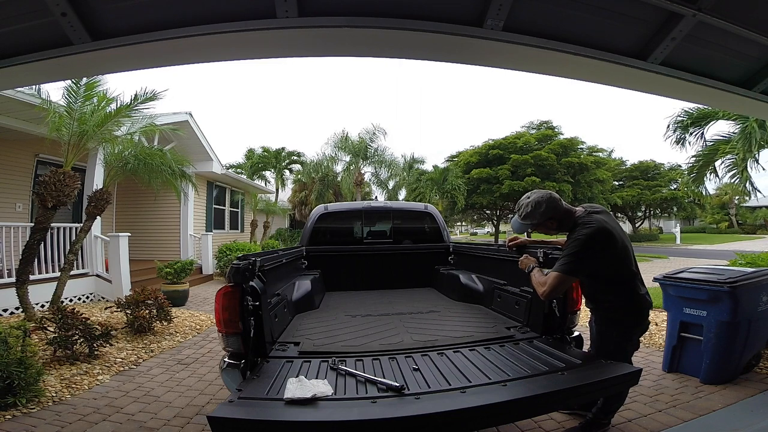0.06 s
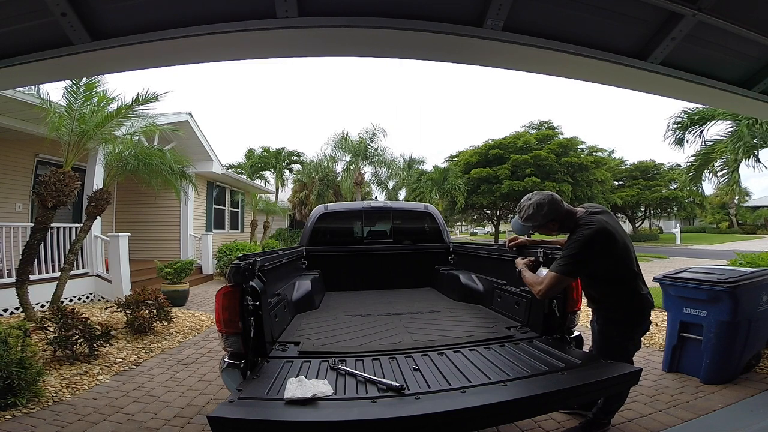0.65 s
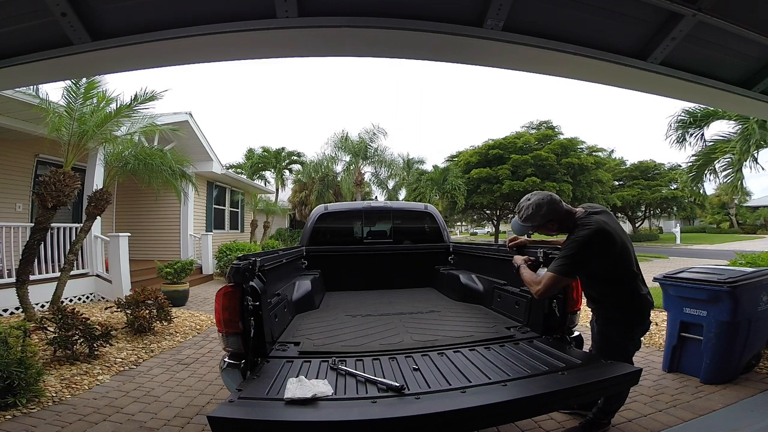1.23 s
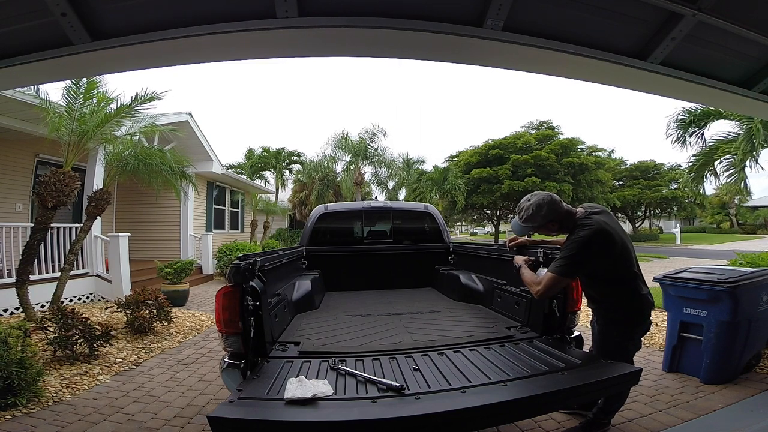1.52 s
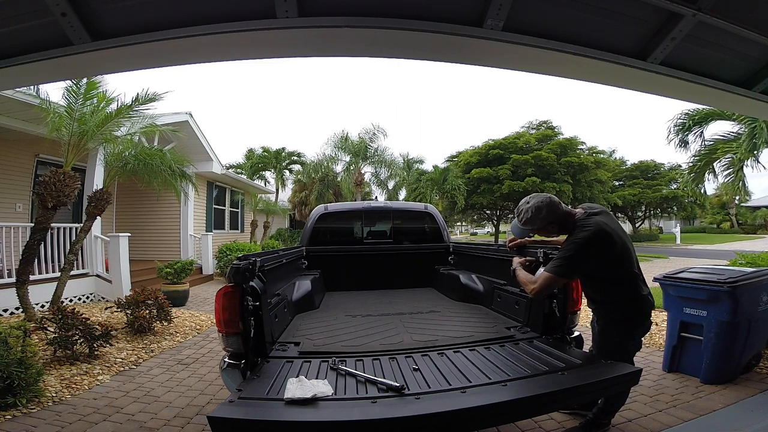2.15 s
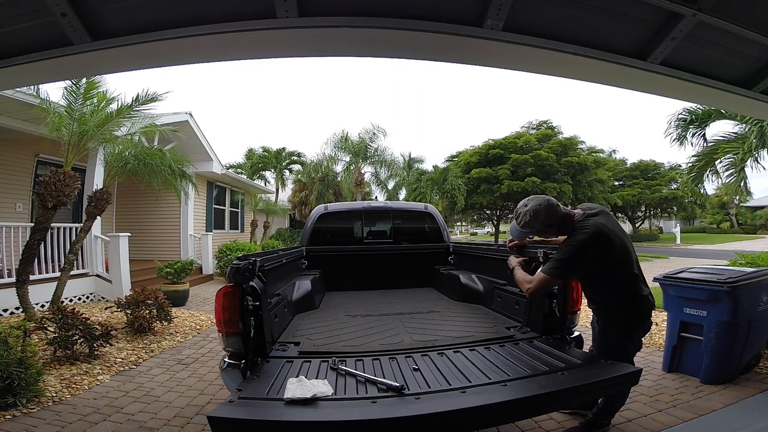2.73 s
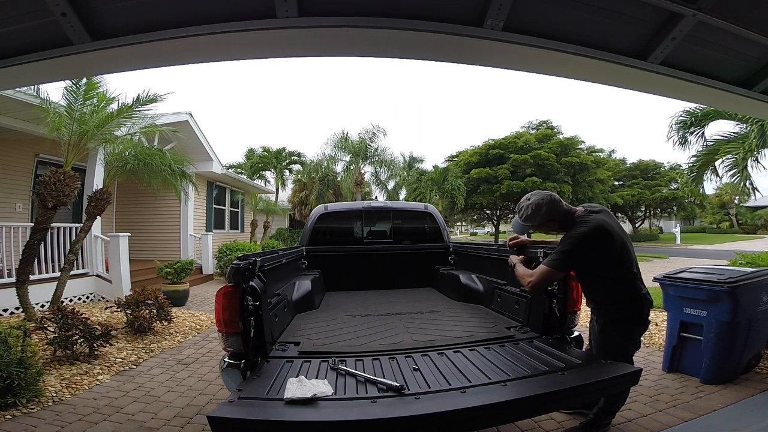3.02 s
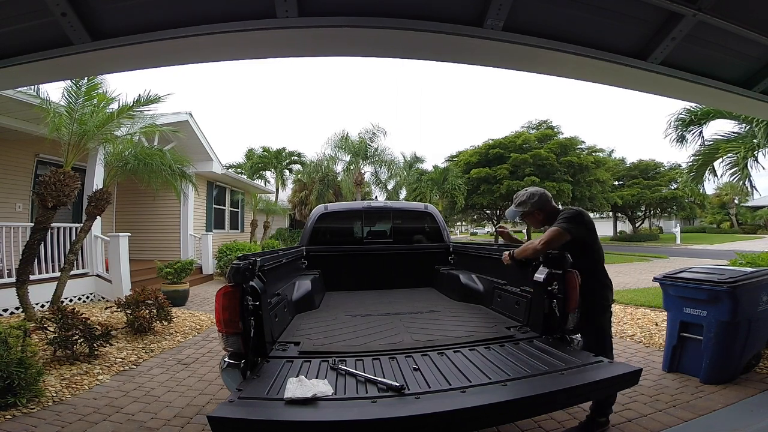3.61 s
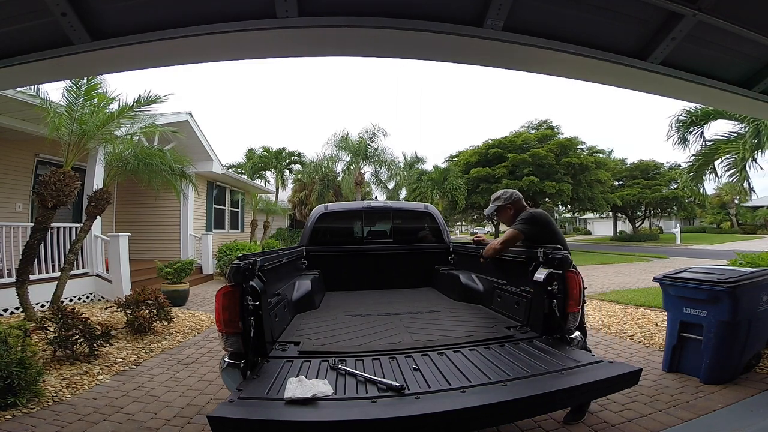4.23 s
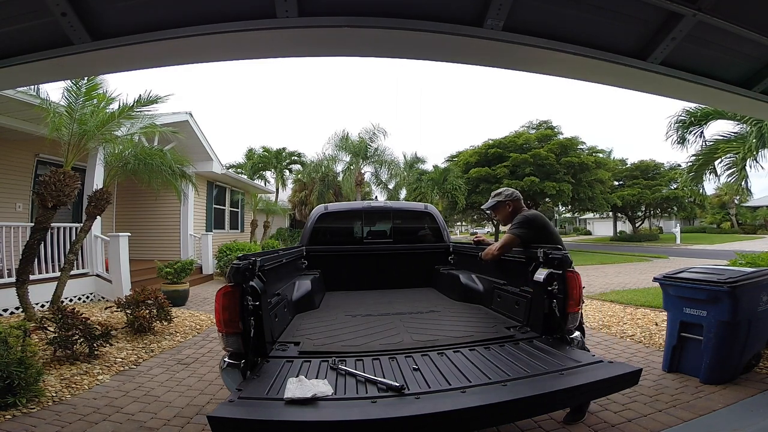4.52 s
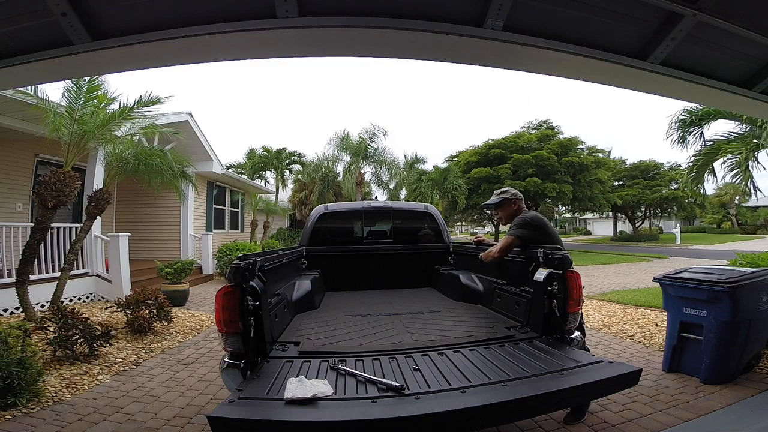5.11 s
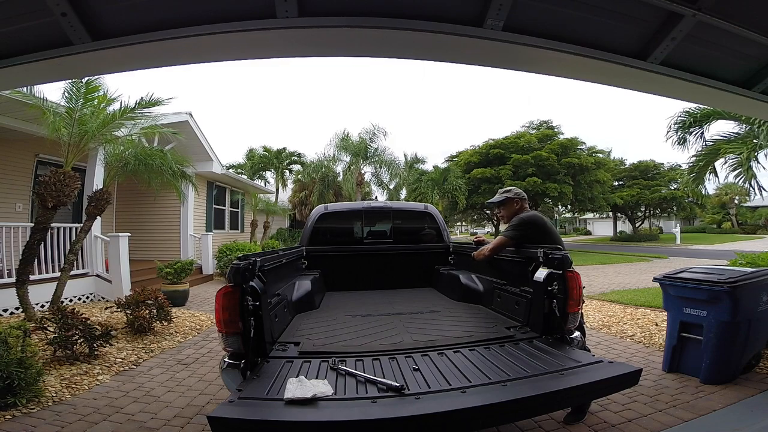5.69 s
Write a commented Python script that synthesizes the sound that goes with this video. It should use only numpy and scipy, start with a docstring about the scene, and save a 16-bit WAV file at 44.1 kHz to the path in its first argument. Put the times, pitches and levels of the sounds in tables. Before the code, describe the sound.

A soft outdoor hiss and a low hum run throughout, with a distant bird giving four faint falling whistles and a couple of short rasps. Up front, a metal bracket is fitted to a pickup's bed rail. After two faint taps, a firm ringing knock comes at 1.3 seconds, then several lighter ones and a sharp knock at 2.3. From 2.6 to 3 seconds the bracket scrapes along the rail in short, rough pushes. A crisp knock at 3.4 starts more scraping, which builds to one bright, ringing clank at about 4.1 seconds, the loudest sound, briefly overloading the microphone. A lull follows with two light taps. From 5.2 to 5.9 seconds, three sharp knocks mix with more jerky scraping. The metal sounds carry a short echo from the truck bed and open garage.

```python
"""A soft outdoor hiss and a low hum, with a bird rasping and whistling some way off.
In front of an open garage, a metal bracket is fitted by hand to the bed rail of a pickup. It knocks
against the rail and sets it ringing, then sticks and slips along it in short, rough pushes.
It hits home with one bright clank that overloads the microphone; a few more knocks and pushes follow."""
import sys
import numpy as np
from scipy import signal
from scipy.fft import rfft, irfft
from scipy.io import wavfile

SR = 44100
rng = np.random.default_rng(int(sys.argv[2]) if len(sys.argv) > 2 else 0)


def store_wav(level_fs):
    """Save 16-bit WAV to argv[1]."""
    pcm = np.round(np.clip(np.atleast_2d(level_fs), -1, 1) * 32767)
    wavfile.write(sys.argv[1], SR, pcm.T.astype(np.int16))


N = 258417
TIME = np.arange(N) / SR
CEILING_HZ = 15600

# Tone of the outdoor hiss. Each row: frequency in Hz, relative level in dB.
HISS_TONE = [(40, -2.5), (80, -3), (260, -2.5), (760, -1), (1200, -2), (3200, -1.5), (5600, -4.5),
             (8000, -9), (12000, -19), (15000, -26.5)]
HISS_DB, RUMBLE_DB, HUM_DB, HUM_HZ = -42.5, -72, -56.5, 60

# The bird's repeated falling whistle. Each entry: start in seconds.
WHISTLE_STARTS = [.06, 1.755, 3.06, 4.935]
WHISTLE_S, WHISTLE_START_HZ, WHISTLE_END_HZ, WHISTLE_DB = .31, 3400, 3003, -48
WALL_DELAY_S, WALL_DB = .165, -4  # slapback of the whistle off a house wall
# The bird's rasps. Each row: start in seconds, length in seconds, dry level in dB.
RASPS = [(-.07, 0.13, -38), (2.454, 0.058, -35)]
# The band of a rasp: low edge in Hz, high edge in Hz.
RASP_BAND = (3480, 5300)
# A rasp's strongest partials. Each row: centre in Hz, width in Hz, lift in dB.
RASP_PARTIALS = [(4020, 83, 6), (4540, 120, 4), (5200, 260, 8)]
# How long the echo tails ring. Each row: frequency in Hz, time to fall 60 dB in seconds.
TAIL_TIMES = [(150, 0.64), (600, 0.51), (1400, 0.4), (2700, 0.44), (6000, 0.41), (14000, 0.48)]

# Bracket knocking on rail. Each row: start in seconds, level in dB, contact cut-off in Hz,
# chatter decay in seconds, ring favoured by the spot struck in Hz.
KNOCKS = [(.21, -46, 1000, .02, 400), (.55, -44, 1200, .012, 500), (1.311, -14.5, 2620, .017, 2460),
          (1.478, -35.5, 1190, 0.021, 500), (1.5232, -31.5, 1480, .007, 1180),
          (1.6139, -21, 1700, .028, 1640), (1.814, -22, 1700, .03, 1700), (1.96, -40.5, 900, 0.013, 800),
          (2.17, -37.5, 730, .013, 440), (2.27, -41.5, 980, .021, 500), (2.3405, -12.5, 4400, .016, 1800),
          (3.055, -45, 700, 0.027, 500), (3.442, -18, 12000, .012, 420), (4.389, -37, 1520, 0.014, 1300),
          (4.724, -40.5, 1870, .019, 1900), (5.3067, -17, 6950, .011, 3400),
          (5.453, -20.5, 5400, .015, 3270), (5.728, -17.5, 10000, .026, 1950)]
# Resonances of rail and truck bed. Each row: centre in Hz, width in Hz, lift in dB.
RAIL_MODES = [(400, 85, 3.5), (461, 42, 11), (571, 11, 4), (604, 83, 9), (778, 16, 6), (833, 20, 5),
              (915, 26, 5), (1066, 380, 14.0), (1244, 22, 7.5), (1500, 155, 5.0), (1745, 23, 5),
              (1844, 29, 7.5), (2150, 22, 4.5), (2750, 22, 6.5), (3015, 130, 4.5), (3290, 20, 2.5),
              (3920, 290, 3.5), (4540, 240, 7), (5190, 250, 6), (6100, 126, 2.5), (6450, 170, 2.5),
              (13948, 172, 3.5)]
# Tone of rail and bed when struck. Each row: frequency in Hz, relative level in dB.
STRUCK_TONE = [(100, -29), (200, -27), (300, -16), (420, -17.5), (700, -10.5), (1000, -18.5), (1800, 0.5),
               (2800, -0.5), (4000, -2), (6500, -5), (10000, -18.5), (15000, -32)]

# The hand's pushes. Each row: arrival at full force in seconds, swell in seconds, hold in seconds,
# level in dB, contact cut-off in Hz.
PUSHES = [(2.608, .028, .04, -22.5, 1150), (2.765, .058, .028, -18, 4000), (2.895, .03, 0.034, -31.5, 1400),
          (3.455, .015, .15, -28.5, 1100), (3.686, 0.029, 0.052, -22, 2400),
          (3.809, 0.061, 0.14, -21.5, 5370), (4.003, .06, .045, -19.5, 4200), (5.28, .06, .015, -27, 2600),
          (5.368, .015, .008, -27, 2000), (5.451, 0.01, 0.0091, -21.5, 6500),
          (5.526, .02, 0.054, -28.5, 1200), (5.602, .014, 0.054, -21.5, 2740),
          (5.752, 0.034, 0.038, -21, 4630), (5.86, 0.016, .03, -24, 5000)]
SWELL_DB, EASE_DB_PER_S, DULLING_DB_PER_OCTAVE = 10, 220, 9.5  # less force, duller contact
DRAG_DB, DRAG_HZ = -35, 990  # level and cut-off of the light drag between pushes
# When the bracket is moving. Each row: start in seconds, stop in seconds.
SLIDES = [(2.583, 2.96), (3.423, 4.085), (5.222, 5.9)]
# Tone of rail and bed when rubbed. Each row: frequency in Hz, relative level in dB.
RUBBED_TONE = [(100, -26), (200, -22.5), (300, -12), (420, -12.5), (700, -5), (1000, -16), (1350, -4.5),
               (1800, 2), (3000, -1), (5000, -5.5), (7000, -7.5), (10000, -17.5), (15000, -22)]
# The bracket's thin squeal as it bites. Each row: centre in Hz, width in Hz, lift in dB.
SQUEAL = [(14000, 200, 11)]

# Tone of the clank. Each row: frequency in Hz, relative level in dB.
CLANK_TONE = [(100, -34), (400, -16.5), (900, -14.5), (1400, -7), (2000, -2.5), (3500, -1.5), (6000, -3),
              (7500, -9), (9500, -23.5), (15000, -37)]
# Resonances of the bracket. Each row: centre in Hz, width in Hz, lift in dB.
BRACKET_MODES = [(1840, 40, 5), (1905, 40, 6), (2120, 90, 7), (2785, 80, 7), (2900, 40, 4), (3160, 90, 5),
                 (3490, 90, 5), (3820, 120, 3), (3945, 50, 5), (4220, 70, 7), (4560, 60, 4), (4920, 140, 3),
                 (5320, 70, 7), (5610, 110, 6), (5980, 40, 9), (6430, 60, 5), (6760, 40, 6)]


def from_db(db):
    """Decibels to gain."""
    return 10 ** (np.asarray(db) / 20)


def rms_one(x):
    """Scale to rms 1."""
    return x / np.sqrt(np.mean(x ** 2) + 1e-20)


def attack_rms_one(x):
    """Scale a hit so that its first 20 ms have rms 1."""
    return x / np.sqrt(np.mean(x[:SR // 50] ** 2))


def at_hz(points, hz):
    """Read a table on a log-frequency axis."""
    known_hz, values = np.transpose(points)
    return np.interp(np.log(np.maximum(hz, 1)), np.log(known_hz), values)


def add(out, start_s, sound):
    """Mix a sound in, trimming what falls outside the scene."""
    at = round(start_s * SR)
    part = sound[max(-at, 0):N - at]
    out[max(at, 0):max(at, 0) + len(part)] += part


def band(x, low_hz, high_hz):
    """Band-pass."""
    return signal.sosfilt(signal.butter(2, [low_hz, high_hz], "band", fs=SR, output="sos"), x)


def drift(rate, size=N):
    """A random wander of rms 1 with about `rate` turns a second."""
    turns = rng.standard_normal(N // 20)
    return rms_one(np.interp(np.arange(size) * rate / SR, np.arange(len(turns)), turns))


def colour(x, tone, resonances=(), size=8192):
    """Minimum-phase EQ: a broad tone curve with ringing peaks on it; white noise keeps its level."""
    hz = np.fft.rfftfreq(size, 1 / SR)
    peaks_db = sum(lift / (1 + (2 * (hz - centre) / width) ** 2) for centre, width, lift in resonances)
    cepstrum = irfft(np.log(from_db(at_hz(tone, hz) + peaks_db)))
    # fold the cepstrum so that the ring comes after the hit
    cepstrum[1:size // 2] *= 2
    cepstrum[size // 2 + 1:] = 0
    return convolve(x, irfft(np.exp(rfft(cepstrum))))


def convolve(x, response):
    """Play a sound through an impulse response scaled to unit energy."""
    return signal.fftconvolve(x, response / np.linalg.norm(response))[:len(x)]


def echoes(build_s, early_s, tail_db):
    """Reflections crowd in, fall away fast and leave a tail that dies band by band."""
    t = np.arange(SR * 3 // 4) / SR
    white = rng.standard_normal((3, len(t)))
    edges_hz = np.geomspace(60, 18000, num=10)
    tail = sum(band(white[k % 2], low, high) * from_db(-60 * t / at_hz(TAIL_TIMES, np.sqrt(low * high)))
               for k, (low, high) in enumerate(zip(edges_hz, edges_hz[1:])))
    early = white[2] * np.exp(-np.maximum(t - build_s, 0) / early_s)
    return (early + from_db(tail_db) * tail) * np.minimum(0.45 + t / build_s, 1)


def outdoors():
    """The ambience: even hiss, a faint rumble and the hum of a motor some way off."""
    hiss = from_db(HISS_DB) * colour(rng.standard_normal(N), HISS_TONE)
    rumble = from_db(RUMBLE_DB) * rms_one(band(rng.standard_normal(N), 29, 55))
    hum_hz = HUM_HZ + 0.48 * drift(4.72)
    hum = from_db(HUM_DB) * rms_one(np.sin(2 * np.pi * np.cumsum(hum_hz) / SR))
    return hiss + rumble + hum


def bird(waver_hz=40, flutter_db=1.5, peak_at=0.4):
    """Thin falling whistles and short rasps, smeared by trees and house walls."""
    out = np.zeros(N)
    progress = np.linspace(0, 1, round(WHISTLE_S * SR))
    glide_hz = WHISTLE_START_HZ + (WHISTLE_END_HZ - WHISTLE_START_HZ) * progress ** 1.25
    swell = np.sqrt(np.minimum(progress / peak_at, (1 - progress) / (1 - peak_at)))
    for start_s in WHISTLE_STARTS:
        hz = glide_hz + waver_hz * drift(130.3, len(progress))
        gain = swell * from_db(WHISTLE_DB + flutter_db * drift(43, len(progress)))
        whistle = gain * rms_one(np.sin(2 * np.pi * np.cumsum(hz) / SR))
        add(out, start_s, whistle)
        add(out, start_s + WALL_DELAY_S, from_db(WALL_DB) * whistle)
    flat_tone = [(hz, 0) for hz in RASP_BAND]
    for start_s, length_s, db in RASPS:
        breath = band(band(rng.standard_normal(SR), *RASP_BAND), *RASP_BAND)
        rasp = colour(breath, flat_tone, RASP_PARTIALS)[:round(length_s * SR)]
        add(out, start_s, from_db(db) * rms_one(rasp) * signal.windows.tukey(len(rasp), .3))
    return out + convolve(out, echoes(build_s=.02, early_s=.09, tail_db=3))


def soften(x, cutoff_hz, order=2):
    """Low-pass: a softer contact excites less treble."""
    return signal.sosfilt(signal.butter(order, min(cutoff_hz, CEILING_HZ), fs=SR, output="sos"), x)


def knocks(rise_at_1khz_s=0.0086, favour_db=6.0):
    """Each knock chatters briefly and rings the rail; a harder contact is brighter and snappier."""
    out = np.zeros(N)
    for start_s, db, cutoff_hz, chatter_s, favoured_hz in KNOCKS:
        rise_s = rise_at_1khz_s / (cutoff_hz / 1000) ** 0.28
        blow = soften(echoes(build_s=rise_s, early_s=chatter_s, tail_db=-7), cutoff_hz)
        favoured = (favoured_hz, .55 * favoured_hz, favour_db)
        ring = colour(blow, STRUCK_TONE, [*RAIL_MODES, favoured])
        add(out, start_s, from_db(db) * attack_rms_one(ring))
    return out


def hand_pushes(grip_s=0.019):
    """Gain and cut-off of the slide: each push swells, holds and eases off; the strongest leads."""
    level_db, contact_hz = np.full(N, -np.inf), np.ones(N)
    for full_s, swell_s, hold_s, db, cutoff_hz in PUSHES:
        slack_db = SWELL_DB * np.maximum(full_s - TIME, 0) / swell_s
        slack_db += EASE_DB_PER_S * np.maximum(TIME - full_s - hold_s, 0)
        leads = db - slack_db > level_db
        level_db[leads] = db - slack_db[leads]
        contact_hz[leads] = cutoff_hz / 2 ** (slack_db[leads] / DULLING_DB_PER_OCTAVE)
    moving = sum(np.clip(np.minimum(TIME - start, stop - TIME) / grip_s, 0, 1) for start, stop in SLIDES)
    return moving * np.hypot(from_db(level_db), from_db(DRAG_DB)), np.hypot(contact_hz, DRAG_HZ)


def edge_mode(cutoff_hz, centre_hz=3660, width_hz=1300, full_lift_db=5, half_lift_hz=5000):
    """The resonance of the bracket's edge, stronger the harder the contact."""
    return centre_hz, width_hz, full_lift_db / (1 + (half_lift_hz / cutoff_hz) ** 2)


def scrapes(slips_per_s=2200, slip_spread_db=1.5, judder_db=1.03, rub_gain=0.085, wet_db=-2.5):
    """Metal sticks and slips in tiny uneven steps that ring the rail under each push."""
    slips = (rng.random(N) < slips_per_s / SR) * rng.choice([-1, 1], N)
    slip_gain = from_db(slip_spread_db * np.minimum(rng.exponential(1, N), 3))
    rub = rub_gain * rng.standard_normal(N)
    friction = (slips * slip_gain + rub) * from_db(judder_db * drift(90))
    # pressed on by hand, the rail rings less freely
    damped = [(hz, width, 0.92 * lift) for hz, width, lift in RAIL_MODES]
    # crossfade six layers, their cut-offs an octave apart, from soft rub to hard bite
    gain, cutoff_hz = hand_pushes()
    layers_hz = 500 * 2. ** np.arange(6)
    octave = np.interp(np.log(cutoff_hz), np.log(layers_hz), np.arange(6))
    direct = np.zeros(N)
    for k, hz in enumerate(layers_hz):
        ring = colour(friction, RUBBED_TONE, [*damped, *SQUEAL, edge_mode(hz)])
        fade = np.maximum(1 - abs(octave - k), 0)
        direct += gain * fade * rms_one(soften(ring, hz, order=1))
    # bed and garage answer with a diffuse wash that shares the power
    wash = convolve(direct, echoes(build_s=0.0056, early_s=0.024, tail_db=-5.5))
    wet = from_db(wet_db)
    return (direct + wet * wash) / np.hypot(1, wet)


def clank(start_s=4.0738, attack_db=2):
    """Steel meets its stop: a dense clash that rings on in the bracket's resonances."""
    clash = echoes(build_s=0.0044, early_s=0.027, tail_db=-5)
    ring = colour(clash, CLANK_TONE, BRACKET_MODES)
    out = np.zeros(N)
    add(out, start_s, from_db(attack_db) * attack_rms_one(ring))
    return out


def scene():
    """The mono mix: metalwork up front, bird and ambience behind."""
    return (knocks() + scrapes() + clank() + bird() + outdoors())[None]


def record(dry):
    """The microphone overloads at full scale, and a steep low-pass takes off the very top."""
    top_cut = signal.ellip(10, .1, 70, CEILING_HZ, fs=SR, output="sos")
    return signal.sosfilt(top_cut, np.clip(dry, -1, 1))


dry = scene()
out = record(dry)
store_wav(out)
```